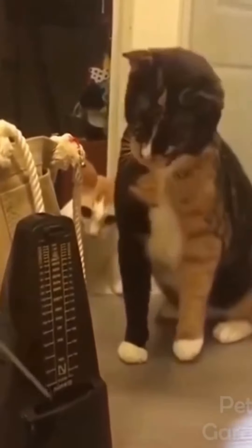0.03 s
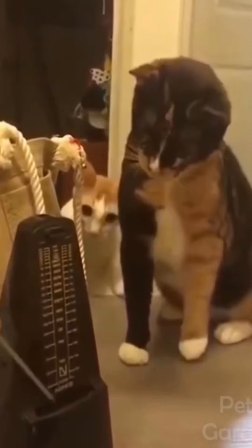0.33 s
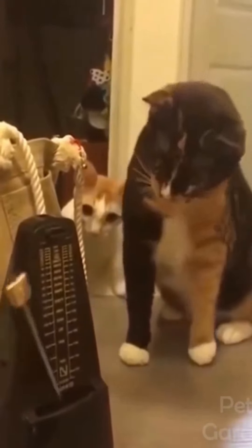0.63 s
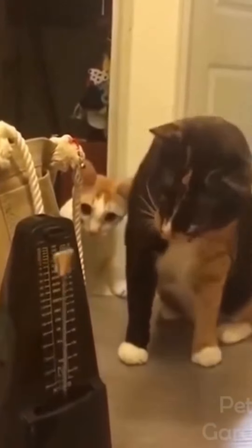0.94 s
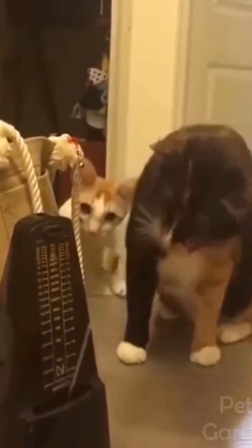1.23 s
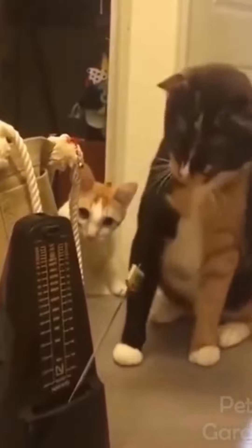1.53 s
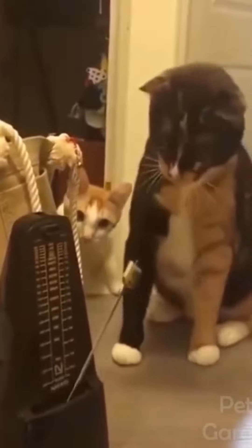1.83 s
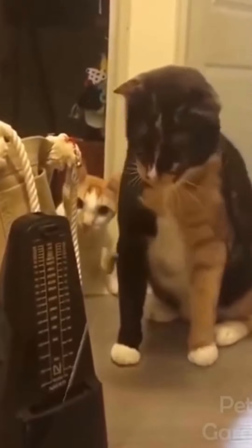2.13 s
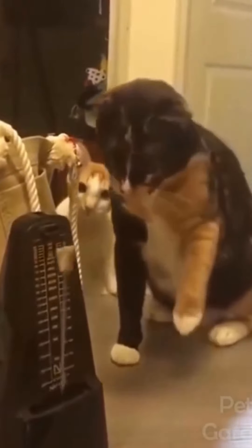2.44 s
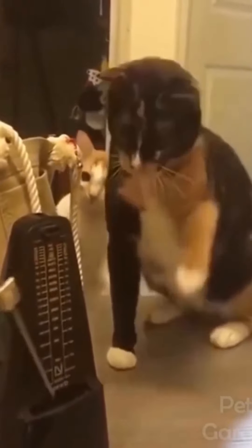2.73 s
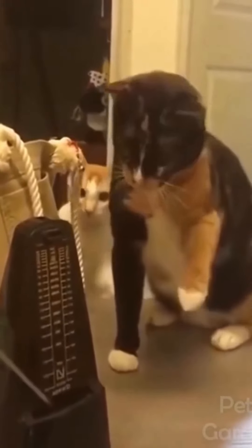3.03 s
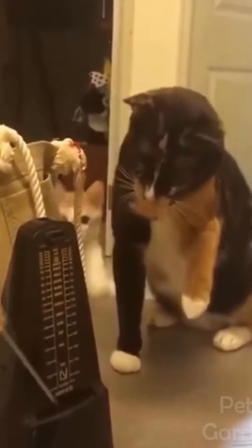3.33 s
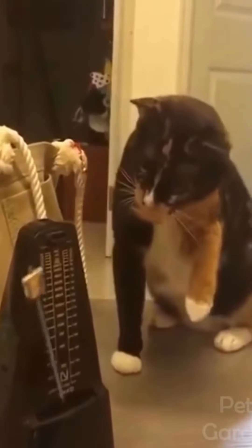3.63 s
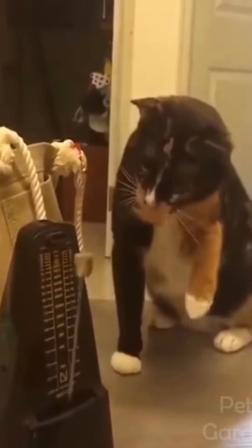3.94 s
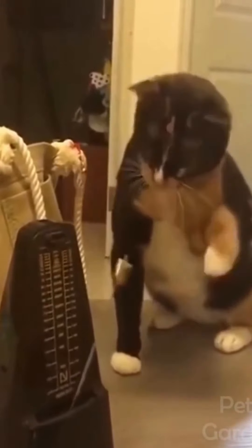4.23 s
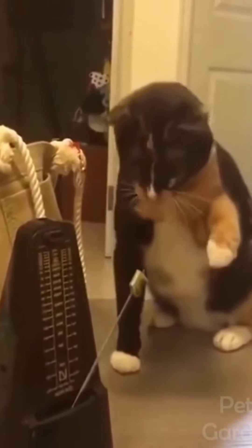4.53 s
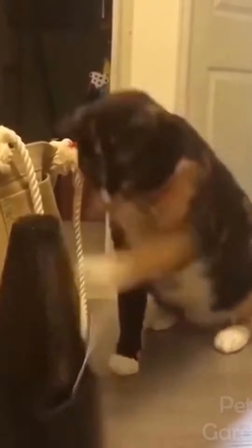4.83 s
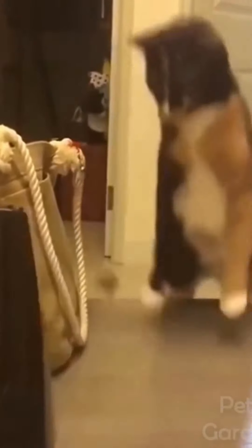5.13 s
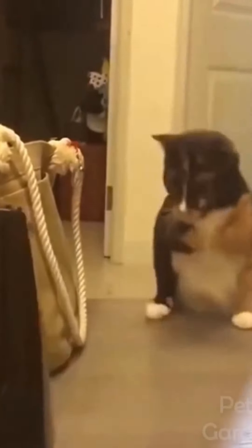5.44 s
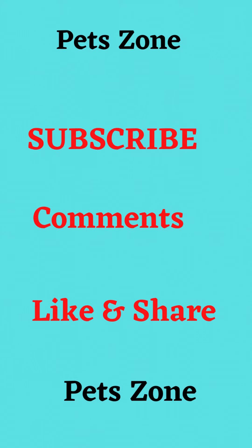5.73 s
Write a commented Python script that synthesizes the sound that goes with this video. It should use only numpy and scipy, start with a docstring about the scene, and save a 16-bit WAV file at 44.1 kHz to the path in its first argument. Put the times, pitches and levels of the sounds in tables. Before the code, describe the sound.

Slow, hollow metronome ticks in a quiet room, then a paw strikes the steel rod and the plastic case rattles on the floor.

```python
"""Small room: a pendulum metronome on the floor, its escapement ticking slowly against the hollow case.
A cat swats the steel rod, which clangs; the plastic case tips, judders, slides and rocks to rest.
Each blow rings shell, rod and floor. Behind: two faint brushes, low ventilation hum, air hiss.
The nearest blows overload the microphone; the sound cuts off just before the end."""
import sys
import numpy as np
from scipy import signal
from scipy.fft import rfft, irfft
from scipy.io import wavfile

SR = 44100
rng = np.random.default_rng(int(sys.argv[2]) if len(sys.argv) > 2 else 0)


def wrap_up_sound(samples):
    """Save the sound to the file named by the first command line argument, as 16-bit audio."""
    columns = np.atleast_2d(samples).T
    # keep every value between -1 and 1, then stretch to whole-number steps
    tamed = np.clip(columns, -1, 1)
    steps = np.round(tamed * 32767).astype(np.int16)
    wavfile.write(sys.argv[1], SR, steps)


N = 254456
IR_SAMPLES = 32768
IR_T_S, IR_F_HZ = np.arange(IR_SAMPLES) / SR, np.fft.rfftfreq(IR_SAMPLES, 1 / SR)

# escapement ticks, the first before t = 0: t/s, level/dB, hardness/(dB/oct), rebound/dB
ESCAPEMENT_TICKS = [(-.037, 12, 0.5, -12), (1.4433, 16, 0.57, -10), (2.8574, 15.5, 0.2, -6.5),
                    (4.3384, 16.5, 0.1, -12)]
# case struck by the escapement: f/Hz, level/dB
CASE_CURVE = [(60, -26), (200, -3.5), (330, 4.5), (430, -11), (620, -5.5), (1100, -8.5), (1520, -9),
              (1780, 0.5), (3400, -9), (3650, -9.5), (4700, -11), (5000, -11), (8400, -19.5), (9800, -25.5),
              (11000, -42.5), (15500, -36)]
# its resonances: f/Hz, width/Hz, peak/dB
CASE_PEAKS = [(651, 111, 16), (809, 24, 15), (919, 24, 15), (1042, 76, 13), (1248, 39, 6), (1409, 34, 10),
              (1763, 20, 8), (1979, 22, 13), (2060, 39, 10), (2178, 30, 9), (2264, 79, 6), (2472, 32, 18),
              (2601, 32, 18), (2669, 20, 9), (2803, 34, 13), (3159, 36, 14), (3290, 65, 16), (3438, 32, 18),
              (4036, 86, 13), (4122, 40, 10), (4563, 40, 9), (4742, 48, 13), (5451, 60, 8), (7153, 70, 7),
              (7892, 296, 10), (8388, 70, 12)]
# paw on rod, then rod on case: t/s, shell/dB, rod/dB, thud/dB
SWAT_BLOWS = [(5.0075, 10.5, 5.5, -3.5), (5.0150, 6, 19, 7)]
# edge landings: t/s, shell/dB, thud/dB, thud f/Hz, flight/s, rebound/dB
EDGE_LANDINGS = [(5.0741, 13.5, 21.5, 430, .025, -8.5), (5.2256, -0.5, 17, 346, .021, -11.5),
                 (5.304, 7, -1, 596, .013, -5), (5.402, 2.5, 2, 500, .015, -12.5),
                 (5.437, 3.5, 13, 395, .012, -7), (5.4459, 5, 19.5, 399, .019, -6)]
# slides of the base: t/s, level/dB, t60/s
BASE_SLIDES = [(5.085, -25, .55), (5.41, -29, .22)]
# case shell knocked from outside, damped by the contact: f/Hz, level/dB
SHELL_CURVE = [(100, -20.5), (400, -6), (800, 3), (1250, -3), (1500, -6.5), (1900, 4), (2300, -1.5),
               (3000, -1.5), (3400, -3.5), (3700, -13.5), (4100, -2), (5000, -10), (8400, -14.5),
               (9300, -44), (15000, -44.5)]
# its resonances: f/Hz, width/Hz, peak/dB
SHELL_PEAKS = [(790, 40, 6), (915, 35, 7), (1250, 60, 5), (1980, 35, 8), (2170, 90, 9), (2480, 40, 5),
               (2803, 50, 5), (3300, 90, 3)]
# steel rod with weight: f/Hz, level/dB
ROD_CURVE = [(100, -20), (300, -1.5), (800, -6), (1500, -19.5), (2100, -6), (3000, -11), (3700, -19),
             (4600, -17.5), (5200, -16.5), (8500, -27.5), (11000, -54.5)]
# its resonances: f/Hz, width/Hz, peak/dB
ROD_PEAKS = [(1251, 148, 12), (1290, 45, 13), (2170, 45, 9), (2471, 30, 9), (3297, 45, 21), (3355, 70, 17),
             (3436, 45, 21), (3967, 50, 16), (4065, 70, 17), (4568, 65, 17), (4745, 55, 18),
             (8293, 474, 13)]
# floor struck by the base: f/Hz, level/dB
FLOOR_CURVE = [(40, -36.5), (130, -16), (185, 0.5), (300, -0.5), (400, -2), (540, -5), (640, -8),
               (1000, -27.5), (1500, -49), (4000, -73)]
# its resonances: f/Hz, width/Hz, peak/dB
FLOOR_PEAKS = [(196.8, 3.3, 6.9), (245.1, 9.3, 13.2), (269.4, 5.4, 8), (329, 3.1, 15), (359.5, 7.6, 15),
               (429, 7.4, 13), (461, 8.7, 13)]
# soft brushes: t/s, level/dB, t60/s
BRUSH_STROKES = [(.197, -51, 0.2), (.86, -60, .3)]
# brush spectrum: f/Hz, relative level/dB
BRUSH_CURVE = [(1500, -20), (4000, -3), (6500, 2), (9300, -10), (10500, -37)]
# ventilation rumble: f/Hz, relative level/dB
RUMBLE_CURVE = [(12, -18.5), (30, -5), (45, -1), (112, -2.5), (168, -5), (215, 1), (350, -1.5), (390, -9.5),
                (500, -4), (700, -11), (1000, -18), (1500, -30), (3000, -77.5)]
# its resonances: f/Hz, width/Hz, peak/dB
RUMBLE_PEAKS = [(55.5, 6, 8.3), (73.4, 9.3, 12.1), (89.7, 3.8, 16.3), (132.9, 8.2, 13.2), (150, 2.3, 8.6),
                (192.2, 9.9, 14.6), (244.3, 11, 7), (271.7, 6.7, 7.7), (302, 9.2, 6), (332, 7.3, 6.2)]
# hum tones: f/Hz, level/dB, waver rate/Hz
HUM_TONES = [(74.5, -41, 2.5), (190.6, -38.5, 4.99)]
# air hiss: f/Hz, relative level/dB
HISS_CURVE = [(900, -28), (1500, 0.5), (2000, 3), (2700, -1.5), (4000, -8.5), (5000, -12.5), (8500, -18.5),
              (9500, -19.5), (10000, -62.5), (16000, -67.5)]
# room decay: f/Hz, t60/s
ROOM_DECAY = [(150, 0.19), (400, 0.22), (1000, 0.51), (2500, 0.38), (5000, 0.4), (9500, 0.37), (10800, .1),
              (16000, .06)]
# wall reflections: delay/s, relative gain
WALL_ECHOES = [(.0072, 0.24), (0.015, 0.48), (0.0305, -0.25)]


def metronome(rebound_s=.0145, rebound_tilt_db_oct=-.5):
    """The escapement strikes the case once per swing and rebounds lightly."""
    out = np.zeros(N)
    for t_s, level_db, tilt_db_oct, rebound_db in ESCAPEMENT_TICKS:
        tick = strike(CASE_CURVE, CASE_PEAKS, tilt_db_oct, chatter_s=.0028, travel_s=.001226)
        rebound = strike(CASE_CURVE, CASE_PEAKS, tilt_db_oct + rebound_tilt_db_oct, chatter_s=.0086)
        add(tick, rebound_s, amp(rebound_db) * rebound)
        add(out, t_s, amp(level_db) * room(tick, wet_db=-36.5, echo_db=-3, rise_s=.0013))
    return out


def swat():
    """The paw catches the steel rod and flings it against the case."""
    out = np.zeros(N)
    for t_s, *levels_db in SWAT_BLOWS:
        add(out, t_s, blow(*levels_db, thud_hz=358, shell_tilt_db_oct=.5, rod_tilt_db_oct=2))
    return out


def rocking(rod_shake_db=-10):
    """The case lands edge after edge, each with its own thud pitch and a softer, duller rebound."""
    out = np.zeros(N)
    for t_s, shell_db, thud_db, thud_hz, flight_s, rebound_db in EDGE_LANDINGS:
        levels_db = shell_db, shell_db + rod_shake_db, thud_db
        add(out, t_s, blow(*levels_db, thud_hz, shell_tilt_db_oct=.55))
        add(out, t_s + flight_s, amp(rebound_db) * blow(*levels_db, thud_hz, shell_tilt_db_oct=-3))
    return out


def judder(start_s=5.129, hops=6, hop_s=.0162, loss_db=1.5, dulling_db_oct=.8, climb_hz=8):
    """The pushed case hops quickly and evenly; each hop is weaker and duller, its thud higher."""
    out = np.zeros(N)
    for k in range(hops):
        hop = blow(shell_db=6, rod_db=-4, thud_db=21, thud_hz=245 + k * climb_hz,
                   shell_tilt_db_oct=2 - k * dulling_db_oct)
        add(out, start_s + k * hop_s, amp(-k * loss_db) * hop)
    return out


def blow(shell_db, rod_db, thud_db, thud_hz, shell_tilt_db_oct, rod_tilt_db_oct=0,
         thud_width_hz=120, thud_peak_db=10, thud_lag_s=.0012, scatter_db=3, detune=.046):
    """One contact drives shell, rod and floor; it detunes and reweights the shell modes at random."""
    draws = rng.standard_normal((len(SHELL_PEAKS), 2))
    shell_peaks = [(f_hz * (1 + detune * shift), width_hz, peak_db + scatter_db * weight)
                   for (f_hz, width_hz, peak_db), (shift, weight) in zip(SHELL_PEAKS, draws)]
    shell = strike(SHELL_CURVE, shell_peaks, shell_tilt_db_oct, chatter_s=.005)
    rod = strike(ROD_CURVE, ROD_PEAKS, rod_tilt_db_oct, chatter_s=.005)
    thud = strike(FLOOR_CURVE, FLOOR_PEAKS + [(thud_hz, thud_width_hz, thud_peak_db)], chatter_s=.006)
    out = amp(shell_db) * room(shell, wet_db=-31, echo_db=-4, rise_s=.0032)
    out += amp(rod_db) * room(rod, wet_db=-37, echo_db=-8, rise_s=.006)
    add(out, thud_lag_s, amp(thud_db) * room(thud, wet_db=-34.5, echo_db=-6, rise_s=.012))
    return out


def strike(curve, peaks, tilt_db_oct=0, *, chatter_s, travel_s=0):
    """Unit-energy impact on a body; harder contact tilts it towards the treble."""
    gain = response(curve, peaks, IR_F_HZ) * amp(tilt_db_oct * np.log2(IR_F_HZ + 1))
    # bending waves: lows arrive late, 1 kHz after travel_s
    dispersion = np.exp(-4j * np.pi * travel_s * np.sqrt(1000 * IR_F_HZ))
    ring = irfft(minimum_phase(gain) * chatter(chatter_s) * dispersion)[:IR_SAMPLES // 2]
    return ring / np.linalg.norm(ring)


def chatter(length_s):
    """Spectrum of contact chatter, flattened to spread a blow in time without colouring it."""
    spectrum = rfft(rng.standard_normal(IR_SAMPLES) * np.exp(-IR_T_S / length_s))
    gate = 1 / (1 + (IR_T_S / (2 * length_s)) ** 10)
    for _ in range(3):
        spectrum = rfft(irfft(spectrum / abs(spectrum)) * gate)
    return spectrum


def scrape(slips_per_s=900, attack_s=.016, floor_db=5):
    """Tiny random slips shake shell and floor, fading as the sliding base slows."""
    envelope = np.zeros(N)
    attack = np.minimum(IR_T_S / attack_s, 1)
    decay_s = np.maximum(IR_T_S - attack_s, 0)
    for t_s, level_db, t60_s in BASE_SLIDES:
        add(envelope, t_s, attack * amp(level_db - 60 * decay_s / t60_s))
    slips = rng.standard_normal(N) * (rng.random(N) < slips_per_s / SR)
    shell = strike(SHELL_CURVE, SHELL_PEAKS, tilt_db_oct=1.5, chatter_s=.011)
    floor = amp(floor_db) * strike(FLOOR_CURVE, FLOOR_PEAKS, chatter_s=.027)
    return signal.fftconvolve(slips / slips.std() * envelope, shell + floor)[:N]


def brushes(attack_s=.002):
    """Faint, bright brushing: decaying noise bursts."""
    out = np.zeros(N)
    for t_s, level_db, t60_s in BRUSH_STROKES:
        envelope = (1 - np.exp(-IR_T_S / attack_s)) * amp(level_db - 60 * IR_T_S / t60_s)
        add(out, t_s, envelope * noise(BRUSH_CURVE)[:IR_SAMPLES])
    return out


def ventilation(rumble_db=-31, hiss_db=-55, waver_hz=1.632, swell_depth=.65):
    """Moving air: resonant rumble, faint hiss, two tones that waver and swell at random."""
    out = amp(rumble_db) * noise(RUMBLE_CURVE, RUMBLE_PEAKS) + amp(hiss_db) * noise(HISS_CURVE)
    for f_hz, level_db, rate_hz in HUM_TONES:
        cycles = np.cumsum(f_hz + waver_hz * drift(rate_hz)) / SR
        swell = 1 + swell_depth * drift(rate_hz)
        out += np.sqrt(2) * amp(level_db) * swell * np.sin(2 * np.pi * cycles)
    return out


def room(sound, wet_db, echo_db, rise_s, reverb_cutoff_hz=9800):
    """Direct sound, wall echoes and a tail decaying band by band; echoes and tail are band-limited."""
    f_hz, t_s, tail = signal.stft(rng.standard_normal(IR_SAMPLES), SR, nperseg=256)
    t60_s = curve_at(ROOM_DECAY, f_hz)[:, None]
    tail *= amp(-60 * t_s / t60_s) * (1 - np.exp(-t_s / rise_s))
    impulse = amp(wet_db) * signal.istft(tail, SR, nperseg=256)[1]
    for delay_s, gain in WALL_ECHOES:
        impulse[round(delay_s * SR)] += gain * amp(echo_db)
    impulse = signal.sosfilt(signal.butter(10, reverb_cutoff_hz, fs=SR, output="sos"), impulse)
    impulse[0] += 1  # direct path
    return signal.fftconvolve(sound, impulse)


def response(curve, peaks, f_hz):
    """Gain of a body: broad curve times resonance peaks."""
    peak_power = sum(amp(peak_db) ** 2 / (1 + (2 * (f_hz - centre_hz) / width_hz) ** 2)
                     for centre_hz, width_hz, peak_db in peaks)
    return amp(curve_at(curve, f_hz)) * np.sqrt(1 + peak_power)


def minimum_phase(gain):
    """Spectrum with this gain that starts at once and rings out."""
    cepstrum = irfft(np.log(gain + 1e-9))
    cepstrum[1:IR_SAMPLES // 2] *= 2
    cepstrum[IR_SAMPLES // 2 + 1:] = 0
    return np.exp(rfft(cepstrum))


def noise(curve, peaks=()):
    """Steady shaped noise, rms 1."""
    gain = response(curve, peaks, np.fft.rfftfreq(N, 1 / SR))
    shaped = irfft(rfft(rng.standard_normal(N)) * gain, N)
    return shaped / shaped.std()


def drift(rate_hz):
    """Slow random motion up to about rate_hz, rms 1."""
    return noise([(0, 0), (rate_hz, 0), (4 * rate_hz, -40), (25 * rate_hz, -120)])


def curve_at(curve, f_hz):
    """Interpolate over log frequency."""
    knots_hz, values = np.transpose(curve)
    return np.interp(np.log(f_hz + 1), np.log(knots_hz + 1), values)


def amp(level_db):
    """dB to gain."""
    return 10 ** (np.asarray(level_db) / 20)


def add(mix, t_s, sound):
    """Mix in at t_s; overhang at either end is dropped."""
    start = round(t_s * SR)
    sound, target = sound[max(-start, 0):], mix[max(start, 0):]
    target[:len(sound)] += sound[:len(target)]


def scene():
    """Mono sum at a microphone near the floor."""
    return (metronome() + swat() + rocking() + judder() + scrape() + brushes() + ventilation())[None]


def record(dry, ceiling=.75, stop_s=5.635, fade_s=.002, cutoff_hz=15900):
    """Soft overload, switch-off, band limit."""
    clipped = dry / (1 + (dry / ceiling) ** 6) ** (1 / 6)
    gate = np.clip((stop_s - np.arange(N) / SR) / fade_s, 0, 1)
    lowpass = signal.firwin(511, cutoff_hz, window=("kaiser", 9), fs=SR)
    return signal.oaconvolve(clipped * gate, lowpass[None], "same")


dry = scene()
out = record(dry)
wrap_up_sound(out)
```